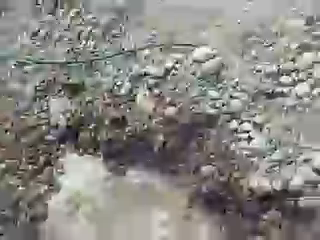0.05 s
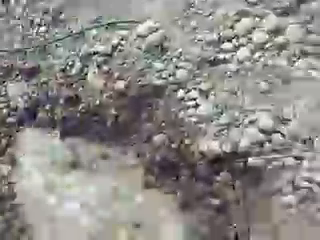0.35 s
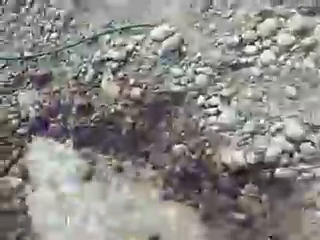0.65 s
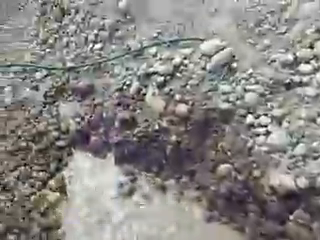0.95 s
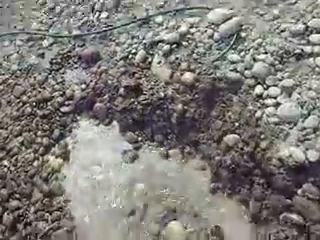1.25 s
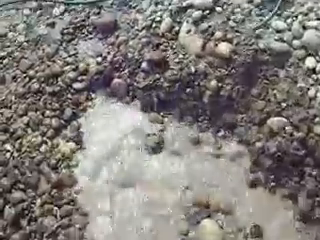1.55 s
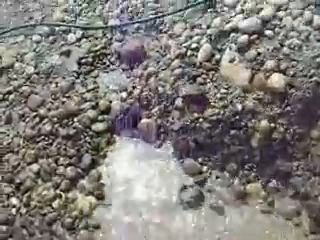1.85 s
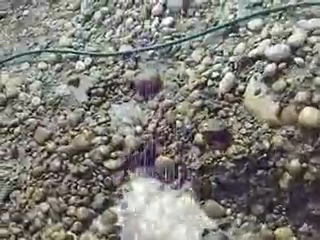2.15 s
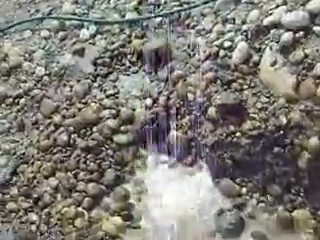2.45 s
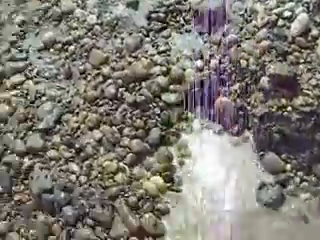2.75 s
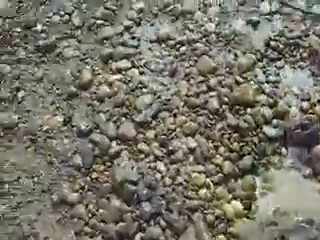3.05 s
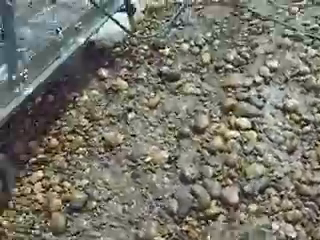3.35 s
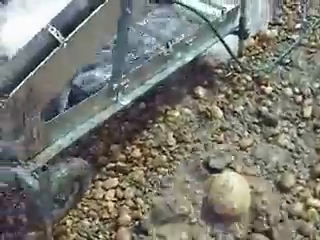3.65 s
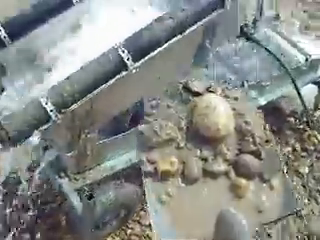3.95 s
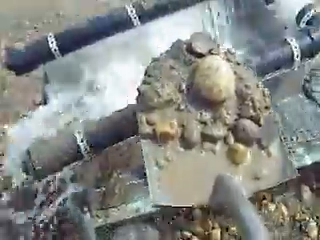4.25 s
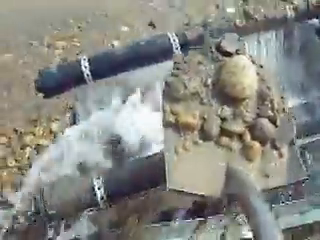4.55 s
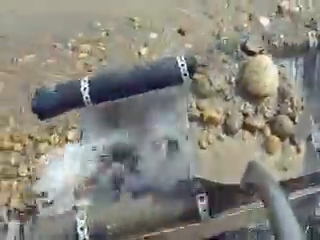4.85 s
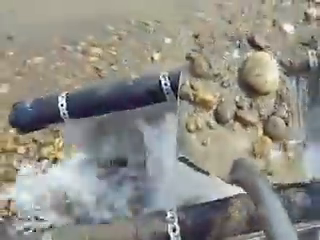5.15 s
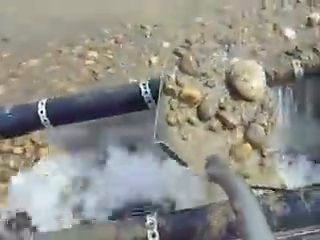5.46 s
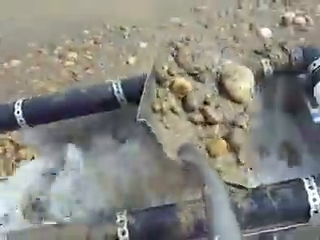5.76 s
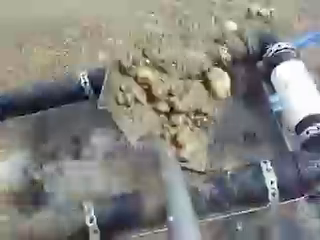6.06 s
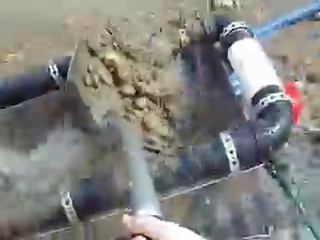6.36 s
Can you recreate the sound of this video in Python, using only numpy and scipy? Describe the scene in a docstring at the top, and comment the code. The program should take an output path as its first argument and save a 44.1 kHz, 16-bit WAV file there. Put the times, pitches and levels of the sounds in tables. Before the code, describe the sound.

Outdoors, close to a mono microphone bumped by puffs of air, a shovel crunches through wet gravel in short, dull shoves. Water splashes, gurgles and sprays in a sluice throughout, its level dropping suddenly and recovering again and again. After the digging stops, the spray grows sharper and the load is tipped: scattered stones clack on a metal hopper, then fall faster with trickling gravel.

```python
"""Water rushes through a highbanker sluice: jets foam in the hopper, spray bars sizzle, the box booms.
The level of the rush drops abruptly several times and creeps back at a steady rate.
A shovel grinds into wet gravel, swings up over the spray bars and tips its load:
stones click against each other and knock on the steel. Air buffets the small mono camera close by."""
import sys
import numpy as np
from scipy import signal
from scipy.fft import rfft, irfft, next_fast_len
from scipy.io import wavfile
from scipy.ndimage import uniform_filter1d, map_coordinates

SR = 44100
rng = np.random.default_rng(int(sys.argv[2]) if len(sys.argv) > 2 else 0)


def store_pcm(level_fs):
    """Save levels as 16-bit WAV."""
    pcm = np.round(np.clip(level_fs, -1, 1) * 32767).astype(np.int16)
    wavfile.write(sys.argv[1], SR, np.atleast_2d(pcm).T)


N = 287159


def amp(db):
    """Decibels to gain."""
    return 10 ** (np.asarray(db) / 20)


def unit(x):
    """x at rms 1."""
    return x / np.sqrt(np.mean(x ** 2) + 1e-20)


def curves(rows):
    """One value per sample for each column after the time."""
    s, *cols = np.transpose(rows)
    return [np.interp(np.arange(N) / SR, s, c) for c in cols]


def wobble(rate):
    """A smooth random curve, rate knots a second."""
    return map_coordinates(rng.standard_normal(int(N * rate / SR) + 4), [np.arange(N) * rate / SR])


def filtered(x, response):
    """x times a response of frequency."""
    size = next_fast_len(N + SR // 4)
    return irfft(rfft(x, size) * response(np.fft.rfftfreq(size, 1 / SR)), size)[..., :N]


def coloured(x, spectrum):
    """x shaped by (Hz, dB) points on a log axis, at rms 1."""
    f, db = np.transpose(spectrum)
    return unit(filtered(x, lambda hz: amp(np.interp(np.log(hz + 1), np.log(f), db))))


def grains(rate, low_hz, high_hz, cycles, spread_db, glide, size):
    """A random shower of damped sines, each a few cycles long and rising in pitch by glide."""
    when, pitch, strength, life = rng.random((int(rate * N / SR), 4)).T[:, :, None]
    hz = low_hz + (min(high_hz, SR / 2) - low_hz) * pitch
    turns = hz * np.arange(size) / SR
    age = turns / (cycles * (.5 + life))  # high grains die sooner
    loudness = amp(-spread_db * np.log(1 - .995 * strength)) * np.sqrt(hz)
    waves = loudness * np.exp(-age) * np.sin(2 * np.pi * turns * (1 + glide * age / 2))
    at = (when * N).astype(int) + np.arange(size)
    return unit(np.bincount(at.ravel(), waves.ravel(), N)[:N])


# abrupt drops in the rush: start_s, depth_db, extra_dip_db
LEVEL_DROPS = [(0.0, 6.5, 1.5), (1.12, 2, 2), (1.39, 4.5, -3), (1.972, 2.5, 1), (2.0, 6, 4),
               (3.066, 8.5, 1.5), (4.408, 2.5, 0.5), (4.74, 4.5, -2), (4.838, 9.5, 3), (5.402, 7, 2.5),
               (5.766, 9, -1), (5.98, 14.5, -1.5), (6.36, 10.5, 2)]


def sag_db():
    """The rush falls at each drop, settles and climbs back steadily; the deepest drop sets the level."""
    fall_s, dip_tau_s, recover_db_per_s = 0.01, 0.039, 13.5
    sags_db = []
    for start_s, depth_db, dip_db in LEVEL_DROPS:
        age_s = np.maximum(np.arange(N) / SR - start_s, 0)
        slow_db = np.maximum(depth_db - recover_db_per_s * age_s, 0)
        quick_db = dip_db * np.exp(-age_s / dip_tau_s)
        sags_db.append(np.minimum(age_s / fall_s, 1) * (slow_db + quick_db))
    return -np.max(sags_db, axis=0)


def swell(middle_s, half_length_s):
    """Bell-shaped rise and fall of height 1."""
    return np.exp(-((np.arange(N) / SR - middle_s) / half_length_s) ** 2)


# slow water level as the camera moves: time_s, splash_db, spray_db
WATER_LEVELS = [(0, -20, -16), (0.2, -22.5, -17), (0.45, -22.5, -18.5), (0.69, -20.5, -16.5),
                (0.79, -14.5, -14.5), (1.35, -17.5, -13.5), (1.88, -16, -14), (2.3, -20.5, -19),
                (2.8, -18.5, -14.5), (3.02, -13, -13), (3.35, -16.5, -11.3), (3.7, -16, -10),
                (4.0, -19, -11.5), (4.27, -18.5, -10.6), (4.52, -12.5, -9), (4.95, -15.5, -10),
                (5.35, -15.5, -10.5), (5.9, -19, -14.5), (6.51, -17, -10.5)]
# jet spurts: middle_s, half_length_s, splash_db, spray_db
JET_SPURTS = [(0.352, 0.04, -0.5, 0), (0.543, 0.08, 1, 0.5), (0.82, 0.052, 0.5, 0.5), (1.05, 0.14, 0.5, 2),
              (1.227, 0.05, 3.5, 1.5), (1.616, 0.045, 2, 1.5), (1.86, 0.035, 1.5, 3.5),
              (2.223, 0.025, 1, 3.5), (2.45, 0.034, 1, 4), (2.524, 0.026, 1, -0.5), (2.82, 0.032, 1, 0.5),
              (3.856, 0.033, 1.5, 1), (4.13, 0.049, 2.5, 2), (4.366, 0.035, 1.5, 1.5),
              (4.593, 0.033, 1.5, 0.5), (4.704, 0.03, 0.5, -1.5), (4.82, 0.018, 3, 1),
              (5.37, 0.027, -1.5, -1.5)]


def water_db():
    """Splash and spray levels: slow course plus spurts and sag."""
    spurts_db = sum(np.outer([splash_db, spray_db], swell(middle_s, half_length_s))
                    for middle_s, half_length_s, splash_db, spray_db in JET_SPURTS)
    return curves(WATER_LEVELS) + spurts_db + sag_db()


def patchy(x, depth_db, size):
    """Each narrow band of x swells and fades by itself, so the rush flickers."""
    bands = signal.stft(x, nperseg=size)[2]
    field = uniform_filter1d(rng.standard_normal(bands.shape), size=3, axis=0)
    field = uniform_filter1d(field, size=3, axis=1)
    return signal.istft(bands * amp(depth_db * np.tanh(unit(field))), nperseg=size)[1][:N]


# hollow ring of the hopper: time_s, pitch_hz
HOPPER_PITCH = [(0.2, 1690), (0.8, 1840), (1.5, 1810), (2.15, 1950), (2.9, 1840), (3.4, 1750), (3.8, 1950),
                (4.3, 1910), (4.65, 1560), (5.1, 1700), (5.7, 1820), (6.4, 1700)]


def hopper_resonance(splash):
    """The hopper lifts one band of the splash, whose pitch drifts over time."""
    lift_db, width_octaves = 3, 0.19
    hz, t, bands = signal.stft(splash, SR, nperseg=1024)
    octaves = np.log2((hz[:, None] + 1) / np.interp(t, *np.transpose(HOPPER_PITCH)))
    lift = amp(lift_db * np.exp(-(octaves / width_octaves) ** 2 / 2))
    return unit(signal.istft(bands * lift, SR, nperseg=1024)[1][:N])


# spectra of the rush: frequency_hz, gain_db
SPLASH_SPECTRUM = [(10, -80), (100, -28), (300, -7), (480, -7), (750, -4), (930, -7), (1200, -2.5),
                   (1550, -3), (2020, -1.5), (2350, -6.5), (2750, -12), (3600, -10), (6000, -10.5),
                   (13000, -26.5)]
SPRAY_SPECTRUM = [(1500, -57), (3000, -21), (4000, -8.5), (5400, -7), (6800, -1), (7500, -2.5),
                  (8300, -0.5), (9600, -4), (10900, -2.5), (12700, -11.5), (13600, -15.5), (14600, -18),
                  (15200, -16.5), (15800, -9.5)]
SIZZLE_SPECTRUM = [(2000, -45), (5200, -13), (6700, -4.5), (8400, -4), (9600, -2.5), (11000, -6),
                   (12700, -17), (13600, -24), (14600, -18), (15800, -32)]
# how openly the spray bars face the microphone: time_s, sizzle_over_spray_db
BAR_FACING = [(0, -24), (3.05, -31), (3.6, 8), (4.1, 4), (4.6, -2.5), (6.51, -7)]


def water_rush():
    """Jets foam in the hopper, fine drops hit the steel and the spray bars sizzle."""
    splash_db, spray_db = water_db()
    surge = wobble(20)  # jet flutter, common to foam and spray
    bubbles = grains(rate=2200, low_hz=338, high_hz=4124, cycles=3.24, spread_db=0, glide=0.069, size=440)
    drops = grains(rate=3000, low_hz=2480, high_hz=13530, cycles=2, spread_db=3.5, glide=0, size=130)
    foam = patchy(bubbles + amp(10) * rng.standard_normal(N), depth_db=4.5, size=1024)
    splash = hopper_resonance(coloured(foam, SPLASH_SPECTRUM))
    mist = patchy(drops + amp(6.5) * rng.standard_normal(N), depth_db=6.5, size=1024)
    spray = coloured(mist, SPRAY_SPECTRUM)
    sizzle = coloured(patchy(rng.standard_normal(N), depth_db=10.5, size=2048), SIZZLE_SPECTRUM)
    facing = amp(curves(BAR_FACING)[0])
    hiss = (spray + facing * sizzle) / np.hypot(1, facing)  # constant power
    return (amp(splash_db + 0.69 + 0.5 * surge) * splash
            + amp(spray_db - 0.6 + 0.31 * surge + 0.69 * wobble(260)) * hiss)


# thrown water: frequency_hz, gain_db
SLOSH_SPECTRUM = [(500, -30), (1100, -5), (2000, -2), (2750, -11), (3600, -2), (6000, -1), (9000, -20)]


def gurgle():
    """Big bubbles ring singly in the foam; gouts of water land as coarse, clumped splashes."""
    bubbles = grains(rate=110, low_hz=850, high_hz=2150, cycles=13, spread_db=1.5, glide=0.025, size=2600)
    gouts = grains(rate=450, low_hz=1000, high_hz=6500, cycles=4, spread_db=2, glide=0.03, size=500)
    slosh = unit(coloured(gouts, SLOSH_SPECTRUM) * amp(4 * wobble(40)))
    splash_db = water_db()[0]
    return amp(splash_db) * (amp(-10.5) * bubbles + amp(-11.5) * slosh)


# fat drops on the hopper walls: time_s, level_db
SPATTER_LEVEL = [(0, -32), (2.3, -27.5), (2.9, -25.5), (3.6, -30.5), (4.7, -26), (5.2, -35), (6.51, -35)]
# their spectrum: frequency_hz, gain_db
SPATTER_SPECTRUM = [(1200, -30), (2400, -5), (2800, -4), (3400, -3.5), (5200, -2.5), (6500, -4.5),
                    (8000, 11), (12000, -40)]


def spatter():
    """Fat drops leave the jets in clumps and burst on the hopper walls."""
    drops = grains(rate=800, low_hz=2300, high_hz=6800, cycles=7, spread_db=1.8, glide=0.04, size=520)
    clumps = amp(2.4 * wobble(35))
    return amp(curves(SPATTER_LEVEL)[0] + sag_db()) * unit(coloured(drops, SPATTER_SPECTRUM) * clumps)


# air on the camera: time_s, level_db
BUFFET_LEVEL = [(0, -41), (0.8, -34.5), (1.75, -30), (2.6, -34.5), (2.95, -30), (3.15, -34), (4.38, -42),
                (4.52, -30.5), (5.35, -27.5), (5.7, -29), (5.95, -35), (6.51, -37)]
# air puffs: middle_s, boost_db
AIR_PUFFS = [(0.32, 6), (0.58, 12), (0.86, 12), (1.31, 10), (1.78, 9), (3.62, 5), (5.05, 4), (5.35, 5),
             (5.68, 8)]
# rumble of air, also of shifting gravel: frequency_hz, gain_db
RUMBLE_SPECTRUM = [(8, -60), (25, -13), (50, -4.5), (85, 2), (125, -2.5), (200, -10), (600, -31.5)]


def air_buffet():
    """Air buffets the moving camera in puffs."""
    puffs_db = sum(boost_db * swell(middle_s, half_length_s=0.05) for middle_s, boost_db in AIR_PUFFS)
    level_db = curves(BUFFET_LEVEL)[0] + puffs_db + sag_db()
    return amp(level_db) * coloured(rng.standard_normal(N), RUMBLE_SPECTRUM)


# sluice box boom: time_s, boom_over_splash_db
BOOM_BALANCE = [(0, -10), (2.9, -7.5), (3.3, -13.5), (4.3, -14), (4.65, -9), (5.0, -9.5), (5.6, -12),
                (6.51, -8)]
# its spectrum: frequency_hz, gain_db
BOOM_SPECTRUM = [(10, -60), (90, -23), (135, -2.5), (175, 0), (240, -4.5), (310, -2), (430, -10.5),
                 (1200, -51)]


def sluice_boom():
    """The stream booms in the sluice box in step with its splash."""
    level_db = curves(WATER_LEVELS)[0] + curves(BOOM_BALANCE)[0] + sag_db()
    return amp(level_db) * coloured(rng.standard_normal(N), BOOM_SPECTRUM)


def shove(start_s, length_s, level_db):
    """Envelope of one push: the blade bites, grinds on, and the gravel settles."""
    attack_s, release_db_per_s = 0.028, 298
    t = np.arange(N) / SR - start_s
    return np.clip(t / attack_s, 0, 1) * amp(level_db - release_db_per_s * np.maximum(t - length_s, 0))


# pushes through the gravel: start_s, length_s, level_db
BLADE_SHOVES = [(0.56, 0.068, -17.5), (0.611, 0.067, -15.5), (0.737, 0.063, -16), (0.8, 0.13, -13.3),
                (1.06, 0.1, -12.5), (1.157, 0.063, -13.5), (1.283, 0.078, -15.5), (1.411, 0.054, -13),
                (1.527, 0.05, -13.5), (1.603, 0.09, -20), (1.692, 0.14, -14), (1.848, 0.02, -16),
                (1.915, 0.066, -18), (2.132, 0.035, -21), (2.285, 0.17, -18.5), (2.64, 0.11, -18.5),
                (2.88, 0.17, -21.5)]
# spectra of slipping stones and loose grit: frequency_hz, gain_db
GRIND_SPECTRUM = [(20, -70), (60, -19), (125, -1.5), (280, 0.5), (450, -1), (650, -3.5), (950, -14),
                  (2000, -36), (5000, -60)]
GRIT_SPECTRUM = [(800, -35), (2000, -9), (2800, 1), (3500, 19), (4900, -28), (7000, -27), (14000, -30)]
# cobbles on the buried blade: start_s, level_db, pitch_hz
COBBLE_BUMPS = [(0.83, 2, 202), (0.951, 6.5, 412), (1.931, 3, 369), (1.975, 3, 415), (2.317, 2, 505),
                (2.349, 5.5, 342), (2.361, 7, 460), (2.394, 3, 517), (2.433, 4, 507), (2.458, 2, 443),
                (2.671, 1, 428)]


def shovel():
    """Buried stones slip along the blade in dull pulses; grit crackles, gravel heaves, cobbles bump."""
    push = np.max([shove(*row) for row in BLADE_SHOVES], axis=0)
    slips = grains(rate=850, low_hz=90, high_hz=1050, cycles=0.86, spread_db=1.5, glide=0, size=900)
    crunch = unit(coloured(slips, GRIND_SPECTRUM) * amp(1.1 * wobble(44.9)))
    ticks = grains(rate=350, low_hz=2010, high_hz=7000, cycles=7.7, spread_db=-9, glide=0, size=260)
    grit = coloured(ticks, GRIT_SPECTRUM)
    heave = coloured(rng.standard_normal(N), RUMBLE_SPECTRUM)
    out = push * (amp(-1) * crunch + amp(-16.5) * grit + amp(-18) * heave)
    t, bump_t60_s = np.arange(SR // 20) / SR, 0.021
    for start_s, level_db, pitch_hz in COBBLE_BUMPS:
        bump = amp(level_db - 7 - 60 * t / bump_t60_s) * np.sin(2 * np.pi * pitch_hz * t)
        out[round(start_s * SR):][:len(t)] += bump
    return out


def ring(modes, t, t60_ratio, pitch_ratio, detune):
    """One blow: every stone lands elsewhere and loads the steel differently."""
    hz, db, t60_s = np.transpose(modes)[:, :, None]
    strength, shift = rng.uniform(-1.5, 1, (2, len(modes), 1))
    gain = amp(db + 3 * strength) * rng.choice([-1, 1], hz.shape)
    decay = amp(-60 * t / (t60_ratio * t60_s))
    waves = gain * decay * np.sin(2 * np.pi * pitch_ratio * hz * (1 + detune * shift) * t)
    return waves.sum(0) / np.linalg.norm(gain)


# stones on steel: start_s, clack_db, slap_db, thud_db, crack_db, t60_ratio, pitch_ratio
STONE_HITS = [(0.8092, 4, -9, -28, -16, 1, 1.1), (3.81, 6, 0, -39, -21, .8, 1.13),
              (4.811, 0, -3, -35, -10, 1, 0.85), (4.828, -4, 3, -39, -10, 0.91, 1),
              (4.95, -9, -20, -37, -14, .7, 1.05), (5.0758, -15, -4, -22, -12, 0.65, 1.05),
              (5.219, 0, -8, -36, -9.5, .7, 1.06), (5.4691, -4, -21, -39, -9.5, .7, 1.05),
              (5.5762, -1, -16, -48, -11.5, .7, 1.1), (5.626, -9, -15, -31, -11.5, .7, 0.93),
              (5.702, 0, -16, -26, -15, .8, 1.1), (5.753, 1.5, -2, -28, -30, 1, 1.07),
              (5.9671, 0, -28, -30, -25, 1.1, 1.03), (5.975, 5, -28, -16.5, -24, 1, 1.01),
              (6.144, -1, -4.5, -43, -17, 0.45, 1.16), (6.2352, -3, 0, -18, -19, 0.7, 1.11),
              (6.2847, -3, -14, -27, -22, 0.43, 0.94), (6.3373, -14, -22, -36, -13.5, .6, 0.83),
              (6.3588, 3, 3, -16, -19, 0.77, 1.02), (6.399, 2, -18, -29, -32, .3, 1.12),
              (6.4264, -1, -14, -28, -29, .6, 1.2), (6.4303, -5, 0.5, -20, -19, .5, 1.3),
              (6.4478, -3, -14, -26, -27, 0.75, 1.06), (6.476, 5, -5, -33, -22, .45, .96),
              (6.4845, -1, -11, -29, -23, .8, 1)]
# modes of the loaded steel: base_pitch_hz, level_db, base_t60_s
CLACK_MODES = [(1163, 1, 0.047), (1261, 8.2, 0.051), (1575, 9.5, 0.057), (1785, 3.5, 0.05),
               (2060, 5, 0.053)]
THUD_MODES = [(300, 5, 0.08), (430, -3, 0.032), (550, 6, 0.026), (735, 3, 0.033)]
# contact noise spectra: frequency_hz, gain_db
SLAP_SPECTRUM = [(100, -35), (400, -12), (750, -1), (1500, 12.5), (2100, -7), (2800, -4), (3500, -2),
                 (5000, -20), (10000, -30)]
CRACK_SPECTRUM = [(500, -29), (2000, -25), (2800, -11), (3800, 1.5), (7000, 5), (11000, 4.5), (13500, -13),
                  (16000, -21)]


def stones_on_steel():
    """Each stone slaps, cracks and rings the steel, which mud and water damp at once."""
    slap_t60_s, crack_t60_s, cushion_s = 0.021, 0.043, 0.00081
    out, t = np.zeros(N + SR), np.arange(SR // 10) / SR
    dull = coloured(rng.standard_normal(N), SLAP_SPECTRUM)
    bright = coloured(rng.standard_normal(N), CRACK_SPECTRUM)
    contact = 1 - np.exp(-t / cushion_s)  # mud cushions the landing
    for start_s, clack_db, slap_db, thud_db, crack_db, t60_ratio, pitch_ratio in STONE_HITS:
        piece = rng.integers(N - len(t)) + np.arange(len(t))
        slap = amp(slap_db - 7 - 60 * t / slap_t60_s) * dull[piece]
        clack = amp(clack_db - 8.5) * ring(CLACK_MODES, t, t60_ratio, pitch_ratio, detune=0.0058)
        thud = amp(thud_db + 10.5) * ring(THUD_MODES, t, t60_ratio, pitch_ratio, detune=0.03)
        crack = amp(crack_db + 3 - 60 * t / crack_t60_s) * bright[piece]
        out[round(start_s * SR):][:len(t)] += contact * (slap + clack + thud + crack)
    return out[:N]


# pebble on pebble: start_s, level_db, pitch_hz
PEBBLE_HITS = [(1.383, -5.5, 4900), (1.9974, -5, 6500), (2.744, -8, 4250), (2.8138, -6, 3800),
               (3.0664, -9.5, 3360), (3.447, -14, 4500), (4.3335, -6, 4600), (5.251, -3, 8800),
               (5.535, -14, 6200), (5.627, -10, 4000), (5.708, -9, 9800), (5.8497, -6, 8000),
               (6.144, -18, 3400), (6.338, -16, 4300), (6.3573, -10, 3500), (6.4315, -15, 2800),
               (6.4771, -3, 1510), (6.505, -10, 7550)]


def pebble_clicks():
    """Colliding pebbles give a short band of noise, higher for smaller stones."""
    t60_s, width_octaves = 0.015, 0.38
    out, t = np.zeros(N + SR), np.arange(SR // 20) / SR
    hz = np.fft.rfftfreq(len(t), 1 / SR) + 1
    for start_s, level_db, pitch_hz in PEBBLE_HITS:
        band = np.exp(-(np.log2(hz / pitch_hz) / width_octaves) ** 2 / 2)
        click = unit(irfft(rfft(rng.standard_normal(len(t))) * band, len(t)))
        out[round(start_s * SR):][:len(t)] += amp(level_db - 60 * t / t60_s) * click
    return out[:N]


# small gravel sliding off the blade: time_s, level_db
TRICKLE_LEVEL = [(0, -70), (6.05, -60), (6.17, -34), (6.4, -33), (6.49, -25)]


def gravel_trickle():
    """Small gravel clatters unevenly into the hopper."""
    taps = grains(rate=130, low_hz=1110, high_hz=2100, cycles=3, spread_db=3, glide=0, size=900)
    return amp(curves(TRICKLE_LEVEL)[0]) * taps


def scene():
    """Open air: one microphone feeds both channels."""
    bed = water_rush() + gurgle() + spatter() + air_buffet() + sluice_boom()
    digging = shovel() + stones_on_steel() + pebble_clicks() + gravel_trickle()
    return np.tile(bed + digging, (2, 1))


def record(dry):
    """The camera rounds off the highest peaks, notches the treble and limits the band steeply."""
    ceiling, notch_hz, notch_half_width_hz, top_hz = 1.05, 7850, 130, 15700
    rounded = dry / (1 + np.abs(dry / ceiling) ** 6) ** (1 / 6)
    notch = lambda hz: 1 - np.exp(-((hz - notch_hz) / notch_half_width_hz) ** 4)
    return filtered(rounded, lambda hz: notch(hz) * (hz < top_hz))


dry = scene()
out = record(dry)
store_pcm(out)
```